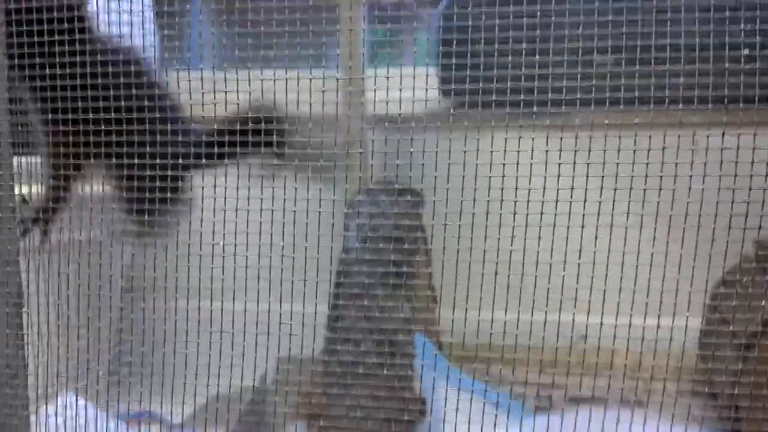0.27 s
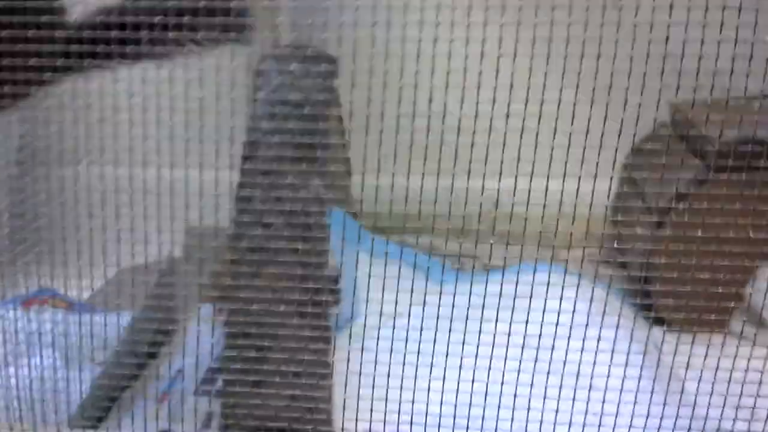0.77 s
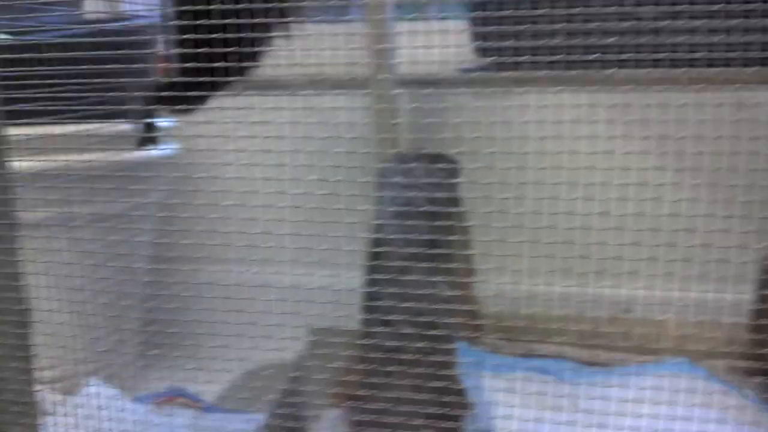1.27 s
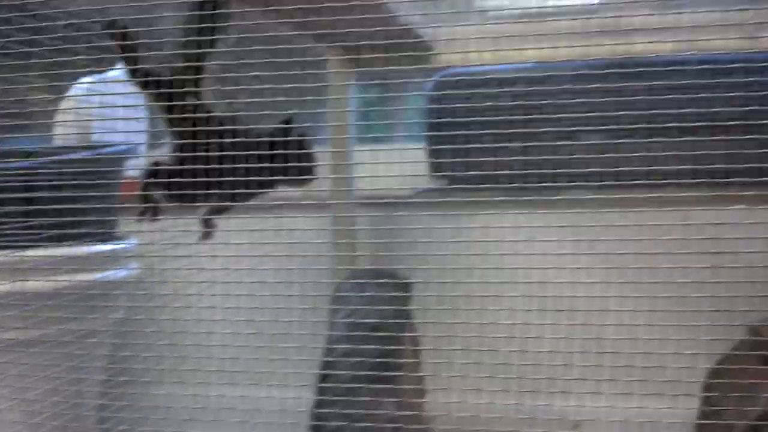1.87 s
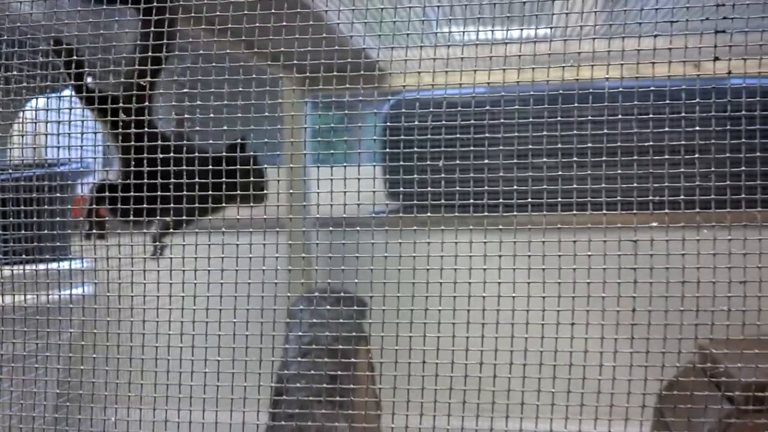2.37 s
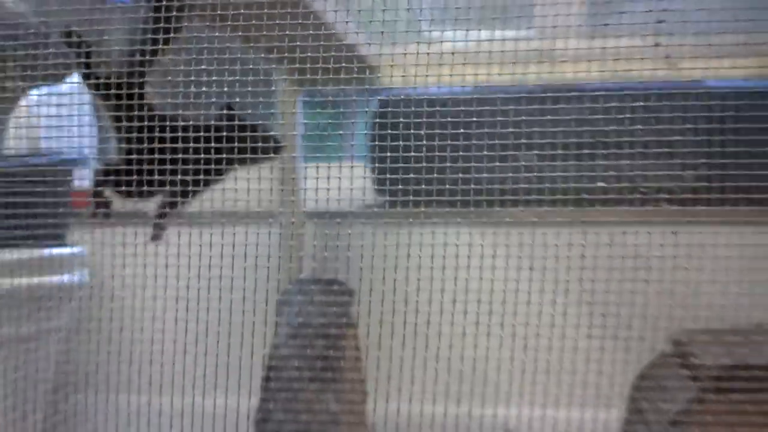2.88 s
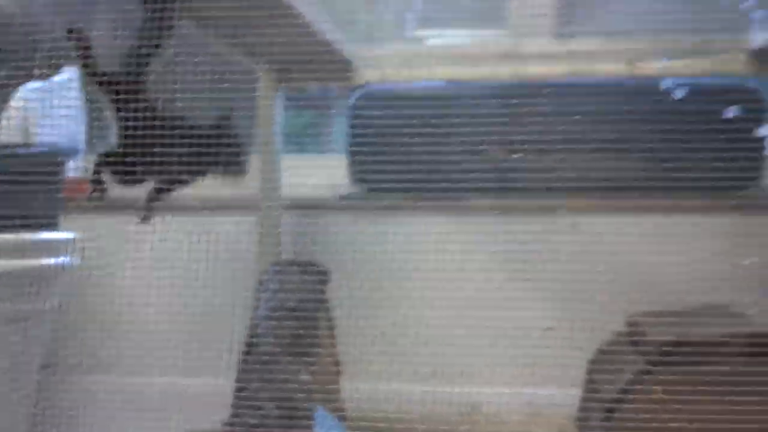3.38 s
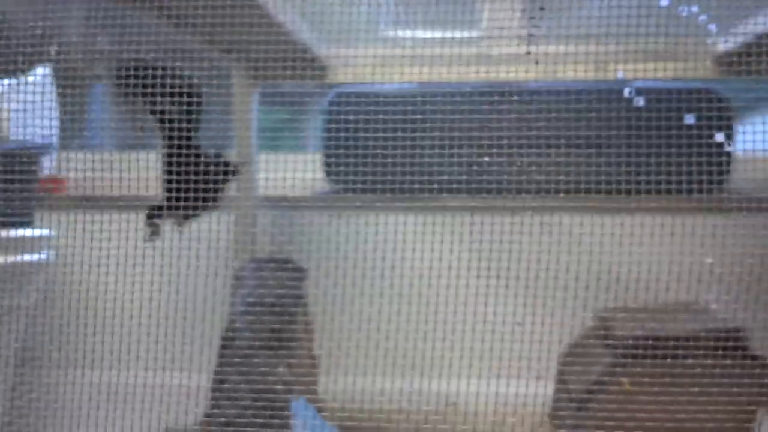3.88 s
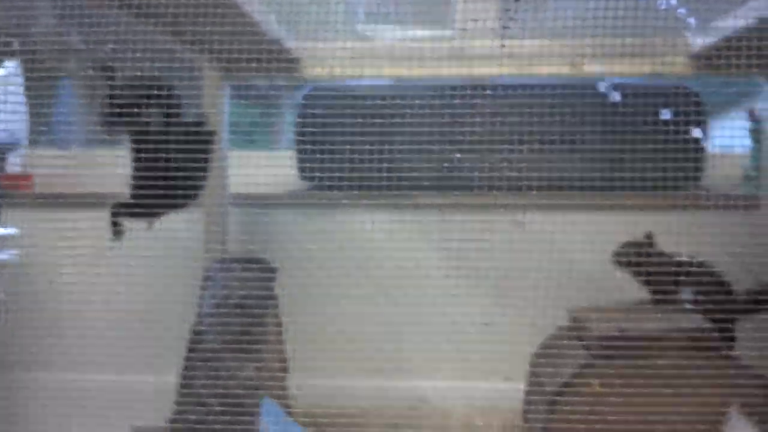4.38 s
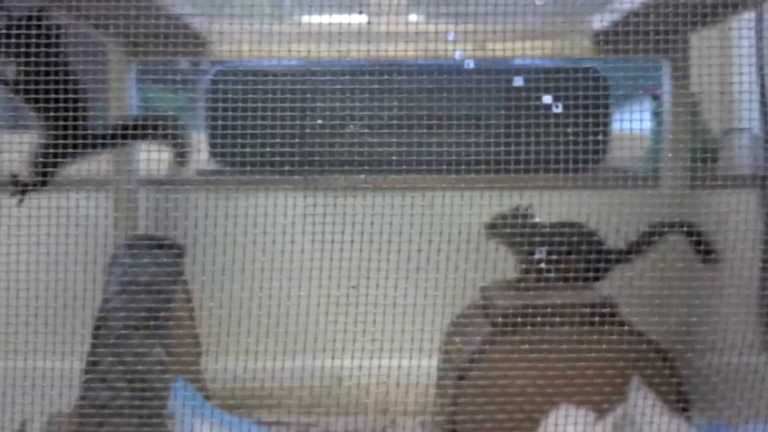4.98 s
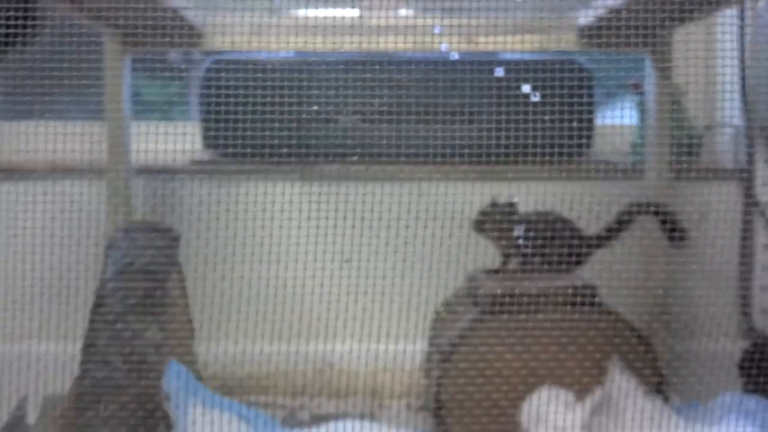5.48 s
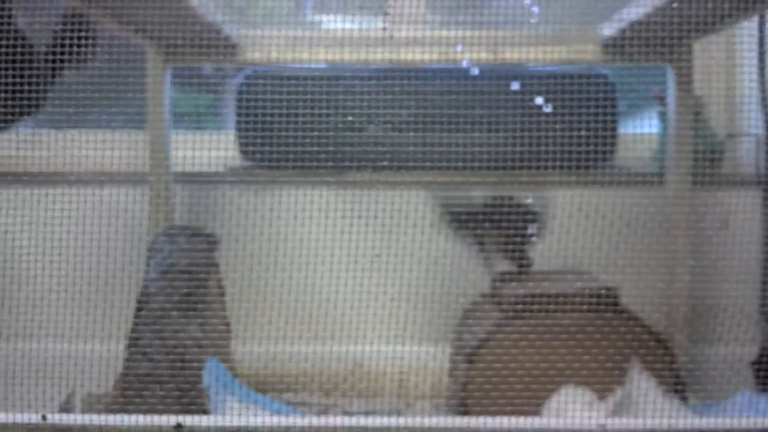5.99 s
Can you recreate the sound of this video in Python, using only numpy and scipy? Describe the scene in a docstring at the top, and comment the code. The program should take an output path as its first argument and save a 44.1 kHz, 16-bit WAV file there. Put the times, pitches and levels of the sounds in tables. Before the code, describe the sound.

In a small room, squirrels cling to a wire cage. Light scratching leads to a dense burst of sharp metallic ticks, scrapes and frame knocks just after one second. It thins to sparse scratches while a faint rasping squeal sags and rises. Around four seconds soft feet thump a hollow wooden box, then another claw flurry comes near five. A low fan hum and faint high lamp whine continue throughout. Close, wide stereo microphone.

```python
"""Young squirrels in a wire cage

Young squirrels scramble over a wire-mesh cage in a small room: claws scrape and tick on the wires, made from
bursts of noise and ringing tones, and the frame knocks through a few resonances.
A thin rasping squeal, built from wavering overtones, passes; one animal hops onto a hollow wooden nest box.
A fan hums and a lamp whines faintly; the camera widens the sound of its two close microphone ports."""
import sys
import numpy as np
from scipy import signal
from scipy.fft import rfft, irfft, next_fast_len
from scipy.io import wavfile
from scipy.ndimage import uniform_filter1d, map_coordinates

SR = 44100
rng = np.random.default_rng(int(sys.argv[2]) if len(sys.argv) > 2 else 0)


def output_pcm(signal):
    """Save a mono or channel-first signal as 16-bit PCM at the path in sys.argv[1].

    Samples are clipped to [-1, 1] before scaling.
    """
    pcm = np.clip(np.atleast_2d(signal).T, -1, 1) * 32767
    wavfile.write(sys.argv[1], SR, np.round(pcm).astype(np.int16))


N = 275297

# Levels in dB in all the tables are relative: each function balances them against its other parts.


def amp(db):
    """Turn dB into a plain multiplier."""
    return 10 ** (np.asarray(db) / 20)


def unit(x):
    """Scale a sound to an average (rms) level of 1."""
    return x / np.sqrt(np.mean(x ** 2) + 1e-20)


def along(points, hz):
    """Read a curve of (Hz, value) points on a log axis."""
    f, v = np.transpose(points)
    return np.interp(np.log(hz + 1), np.log(f + 1), v)


def curves(rows):
    """One value per sample for each column after the time."""
    s, *cols = np.transpose(rows)
    return [np.interp(np.arange(N) / SR, s, c) for c in cols]


def wobble(rate):
    """A smooth random curve with this many random knots a second."""
    knots = rng.standard_normal(int(N * rate / SR) + 4)
    return map_coordinates(knots, [np.arange(N) * rate / SR])


def filtered(x, response):
    """Shape x by a response that depends on frequency."""
    n = x.shape[-1]
    m = next_fast_len(n + SR // 4)
    return irfft(rfft(x, m) * response(np.fft.rfftfreq(m, 1 / SR)), m)[..., :n]


def coloured(x, spectrum):
    """x shaped by the given spectrum, at rms 1."""
    return unit(filtered(x, lambda hz: amp(along(spectrum, hz))))


def resonate(x, modes):
    """Pass x through a body's resonances, added with alternating sign."""
    def response(f):
        total = 0
        for k, (centre, width, db) in enumerate(modes):
            damping = 1j * f * width
            total = total + (-1) ** k * amp(db) * damping / (centre ** 2 - f ** 2 + damping)
        return total
    return filtered(x, response)


def ringing(x, modes):
    """The sum of separate narrow resonances driven by x."""
    return sum(resonate(x, [mode]) for mode in modes)


def tilted(hz, db_per_octave, pivot_hz):
    """dB that a harder or softer blow adds to a mode."""
    return db_per_octave * np.log2(hz / pivot_hz)


# How alike the two microphone ports hear a spread-out sound.
# Each row: frequency in Hz, likeness (1 the same, 0 unrelated, below 0 opposed).
PORT_LIKENESS = [(60, -1.08), (130, -0.77), (290, 0.16), (640, 0.27), (1400, 0.4), (2500, -0.13),
                 (15000, -0.008)]


def ports(pair):
    """Two unrelated sounds become a diffuse field at the two ports."""
    def shares(hz):
        turn = np.arccos(np.clip(along(PORT_LIKENESS, hz), -1, 1)) / 2
        return np.array([np.cos(turn), np.sin(turn)])
    mid, side = filtered(pair, shares)
    return np.array([mid + side, mid - side])


def add(track, s, sound):
    """Mix a sound into the track at time s in seconds."""
    start = max(0, round(s * SR))
    track[:, start:start + sound.shape[-1]] += sound[..., :N - start]


# How long the small room rings. Each row: frequency in Hz, time to fall by 60 dB in seconds.
ROOM_DECAY = [(150, 0.42), (1000, 0.13), (4000, 0.069), (15000, 0.11)]
WALL_S = 0.018  # round trip to the nearest wall


def in_room(x, wet_db, wall_db=-30):
    """The sound, its echo off the nearest wall and a fresh tail, each frequency dying at its own speed."""
    hz, t, z = signal.stft(rng.standard_normal((2, SR // 3)), SR, nperseg=256)
    fade = amp(-60 * t / along(ROOM_DECAY, hz)[:, None]) * (1 - np.exp(-t / 0.0023))
    tail = ports(signal.istft(z * fade, SR, nperseg=256)[1])
    tail *= amp(wet_db) / np.linalg.norm(tail[0])
    tail[:, round(WALL_S * SR)] += amp(wall_db)
    return x + signal.fftconvolve(np.atleast_2d(x), tail, axes=1)[:, :x.shape[-1]]


# The fan's draught, as a noise colour. Each row: frequency in Hz, strength in dB per Hz.
DRAUGHT_COLOUR = [(25, -1), (60, -5), (105, 5), (200, 5.5), (350, 5), (700, -0.5), (1200, -9), (2000, -19),
                  (4000, -23.5), (8000, -41), (15000, -21.5)]
# How loud the blade tone is. Each row: time in seconds, level in dB.
BLADE_TONE_LEVEL = [(0, -45.5), (0.7, -45.5), (0.83, -48.5), (0.95, -46.5), (2.33, -45.5), (2.45, -49),
                    (2.57, -45), (3.0, -45), (3.12, -49.5), (3.25, -44), (5.0, -43.5), (5.5, -43.5),
                    (6.2, -44.5)]
DRONE_HZ, DRONE_DB, BLADE_HZ = 195.6, -58.5, 525.9  # the fan's two tones


def fan():
    """Steady moving air (noise), a faint wavering drone and a blade tone that swells and dips."""
    t = np.arange(N) / SR
    blade_db, = curves(BLADE_TONE_LEVEL)
    drone_swing = np.sin(2 * np.pi * DRONE_HZ * t + 0.68 * wobble(7.5))
    drone = amp(DRONE_DB + 1.8 * wobble(3.96)) * drone_swing
    blade_swing = np.sin(2 * np.pi * BLADE_HZ * t + 0.18 * wobble(9.7))
    blade = amp(blade_db + 0.34 * wobble(7.6)) * blade_swing
    air = coloured(ports(rng.standard_normal((2, N))), DRAUGHT_COLOUR)
    return amp(-49.0) * air + (drone + blade) * amp([[-.8], [.8]])  # tones slightly to the right


# The lamp's two high resonances. Each row: centre in Hz, width in Hz.
LAMP_RESONANCES = [(11370, 330), (12140, 200)]
# How loud they are. Each row: time in seconds, lower resonance in dB, upper resonance in dB.
LAMP_LEVELS = [(0, -66, -68), (0.5, -65, -70), (0.7, -70, -66), (2.0, -68.5, -68), (3.4, -66, -71),
               (4.2, -64.5, -69), (4.6, -66, -74), (5.5, -65, -76), (6.2, -70, -76)]


def lamp():
    """Mains harmonics fill the lamp's two high resonances, which come and go in turn as the camera moves."""
    harmonics_hz = 59.94 * np.arange(184, 207)
    t = np.arange(N) / SR

    def harmonic(hz):
        start_phase = rng.uniform(0, 2 * np.pi, (2, 1))
        flicker = amp(4 * wobble(1.5))
        return flicker * np.sin(2 * np.pi * hz * t + 1.5 * wobble(2.5) + start_phase)

    lines = [harmonic(hz) for hz in harmonics_hz]

    def cluster(centre, width):
        weights = 1 / np.sqrt(1 + (2 * (harmonics_hz - centre) / width) ** 4)
        return unit(sum(weight * line for weight, line in zip(weights, lines)))

    levels = curves(LAMP_LEVELS)
    return sum(amp(db) * cluster(*resonance) for resonance, db in zip(LAMP_RESONANCES, levels))


def slips(per_second, spread_db, t60, rub):
    """Noise in tiny stick-slip bursts of uneven size over a share of steady rubbing."""
    t = np.arange(SR // 10) / SR
    sizes = amp(spread_db * np.minimum(rng.exponential(size=N), 3)) ** 2
    energy = (rng.random(N) < per_second / SR) * sizes
    power = np.abs(signal.fftconvolve(energy, amp(-60 * t / t60) ** 2)[:N])
    power /= uniform_filter1d(power, size=4000) + power.mean() / 20  # evens out crowded moments
    return np.sqrt(power + abs(rub)) * rng.standard_normal((2, N))


def clicks(count, low_hz, high_hz, cycles, spread_db):
    """Single claw contacts at random moments, each a dying tone of its own pitch and size; rms 1."""
    t = np.arange(SR // 40) / SR

    def train():
        when, pitch, size = rng.random((count, 3)).T[..., None]
        hz = low_hz * (high_hz / low_hz) ** pitch
        loudness = amp(spread_db * np.minimum(-np.log(1 - size), 2)) * np.sqrt(hz)
        grains = loudness * np.exp(-t * hz / cycles) * np.sin(2 * np.pi * hz * t)
        places = (when * N).astype(int) + np.arange(len(t))
        return np.bincount(places.ravel(), grains.ravel(), N)[:N]

    return unit(ports(np.array([train(), train()])))


# How restless the clinging animals are. Each row: time in seconds, extra level in dB.
RESTLESSNESS = [(0, 5.5), (0.7, 1.5), (2.5, 1.5), (3.65, 6), (4.4, 0.5), (6.2, -0.5)]
# A paw drags over the mesh. Each row: start in seconds, length in seconds, rattle of the panel in dB,
# scrape on the wire in dB, sharpness of the claws in dB (hiss compared with scrape).
PAW_STROKES = [(0.143, 0.057, -59, -52, 5), (0.258, 0.15, -52, -53, 4.5), (0.407, 0.13, -59.5, -58, 4.5),
               (0.839, 0.099, -64, -59, 7), (0.958, 0.13, -51.5, -54.5, 0.5),
               (1.072, 0.075, -41.5, -38, 1.5), (1.166, 0.12, -40, -41, 1.5),
               (1.296, 0.064, -42.5, -40.5, 3), (1.357, 0.049, -41, -50.5, 6),
               (1.483, 0.097, -54, -53.5, 2.5), (1.535, 0.19, -54, -56, 5.5),
               (1.714, 0.12, -53.5, -51.5, 2.5), (2.093, 0.14, -77, -48, 2), (2.209, 0.16, -52, -51, 1),
               (2.639, 0.066, -69, -53.5, 3.5), (2.674, 0.1, -54.5, -49, 1), (2.826, 0.041, -56, -55.5, 0),
               (2.897, 0.083, -55, -58.5, 11), (2.961, 0.086, -51, -50, -2), (3.122, 0.056, -62, -57, 1.5),
               (3.315, 0.049, -58, -74, 11), (3.392, 0.051, -66, -57.5, 6.5), (3.729, 0.084, -58, -52.5, 5),
               (3.781, 0.035, -47, -56, 11), (3.824, 0.091, -42.5, -45.5, 0.5), (3.964, 0.084, -59, -52, 1),
               (4.075, 0.12, -55.5, -56.5, 3), (4.582, 0.12, -58.5, -57.5, 3.5),
               (4.71, 0.047, -49.5, -48, -2), (4.898, 0.13, -45.5, -51, 3.5),
               (5.078, 0.064, -45.5, -45.5, -4), (5.146, 0.036, -39.5, -43, -1.5),
               (5.227, 0.026, -41.5, -50, 1.5), (5.818, 0.027, -53.5, -61.5, 4),
               (5.911, 0.081, -55.5, -55.5, 0), (6.121, 0.049, -46, -50, -4)]
GRIP_S = 0.028  # a claw takes this long to bite


def effort(levels_db, fall_db_per_s, cling_db):
    """Each stroke bites, holds and dies away; the strokes add in power over the stir of clinging paws."""
    restless_db, = curves(RESTLESSNESS)
    power = amp(cling_db + restless_db) ** 2
    t = np.arange(N) / SR
    for (start, length, *_), db in zip(PAW_STROKES, levels_db):
        near = slice(max(0, int(start * SR)), int((start + length + 0.5) * SR))
        age = t[near] - start
        bite = np.clip(age / GRIP_S, 0, 1)
        power[near] += (bite * amp(db - fall_db_per_s * np.maximum(age - length, 0))) ** 2
    return np.sqrt(power)


# Noise colours of the rattling panel, a scraped wire and a sharp claw tip on wire.
# Each row: frequency in Hz, strength in dB per Hz.
PANEL_COLOUR = [(40, -43), (100, -16), (250, -6.5), (540, 1), (800, 1), (1000, -0.5), (1280, -1.5),
                (1520, -9.5), (2400, -10.5), (4000, -20), (8000, -65)]
WIRE_COLOUR = [(600, -14), (1700, 0.5), (2700, 1), (4200, 2.5), (6000, -1.5), (8000, -11), (12000, -16.5)]
TIP_HISS_COLOUR = [(2000, -53), (6000, -3), (9000, -0.5), (12500, 0.5), (15000, 3.5), (16000, 4)]
# Resonances of the stretched mesh. Each row: centre in Hz, width in Hz, level in dB.
MESH_RESONANCES = [(1296, 31, -28), (1620, 52, 2), (1940, 12, -22), (2380, 150, 8), (3650, 56, 4),
                   (4570, 20, -13)]
RATTLE_FALL_DB_PER_S, SCRAPE_FALL_DB_PER_S, HISS_FALL_DB_PER_S = 142, 126, 134  # after the paw lets go
# animals hanging on the mesh never keep quite still (before restlessness is added)
CLING_RATTLE_DB, CLING_SCRAPE_DB, CLING_HISS_DB = -62, -68.5, -65.5


def scramble():
    """Claws slip and click over wires, which ring, hiss under a sharp tip and set the loose panel rattling."""
    _, _, rattle_db, scrape_db, sharp_db = np.transpose(PAW_STROKES)  # one set of strokes drives all layers
    rattle = coloured(ports(slips(per_second=140, spread_db=1.5, t60=0.042, rub=0.56)), PANEL_COLOUR)
    ring = coloured(ports(slips(per_second=210, spread_db=0.0, t60=0.11, rub=0.4)), WIRE_COLOUR)
    hiss = coloured(ports(slips(per_second=210, spread_db=-1.0, t60=0.042, rub=0.48)), TIP_HISS_COLOUR)
    taps = clicks(count=600, low_hz=628, high_hz=1880, cycles=2.3, spread_db=4.0)
    pings = clicks(count=650, low_hz=2076, high_hz=6900, cycles=9, spread_db=6.0)
    panel = amp(-0.5) * rattle + amp(-5.0) * taps
    wires = amp(-2.0) * ring + amp(-5.5) * pings
    cage = panel * effort(rattle_db, RATTLE_FALL_DB_PER_S, CLING_RATTLE_DB)
    cage = cage + wires * effort(scrape_db, SCRAPE_FALL_DB_PER_S, CLING_SCRAPE_DB)
    cage = cage + amp(0.5) * hiss * effort(scrape_db + sharp_db, HISS_FALL_DB_PER_S, CLING_HISS_DB)
    return in_room(cage + amp(-10) * ringing(cage, MESH_RESONANCES), wet_db=-3.0)


# A claw snaps off a wire. Each row: start in seconds, level in dB, share of hiss in dB,
# pitch of the wire in Hz, its ping in dB, first crack in dB (these last two compared with the level).
WIRE_TICKS = [(0.082, -39, -0.5, 6350, -12, -6), (0.199, -44, 2, 6000, -10, -8),
              (0.4882, -45.5, -24, 3585, 5.5, -12), (0.9442, -34, 0, 3360, -12, -13),
              (1.046, -29.5, -0.5, 3760, -6.5, -12), (1.078, -29.5, -1, 2960, 2, 10.5),
              (1.1273, -24, 1, 3220, -11, -2), (1.1503, -25.5, -14, 3660, -14, -4),
              (1.186, -40, 0, 4170, -8, -3), (1.215, -31, -16, 3400, 1, 4), (1.302, -26, 1, 2710, -17, -4),
              (1.3368, -24, -12, 4260, -3, 1), (1.354, -33, -10, 4270, -3, -2),
              (1.435, -28.5, -5, 3230, -0.5, -3), (1.533, -43, -10, 3640, 2, 6),
              (1.556, -32.5, -4, 5700, -13, 6.5), (1.743, -47, -7, 4140, -10, -3),
              (1.784, -33.5, -17, 2870, -11, -6), (1.8617, -34.5, -20, 2530, -8, -9),
              (1.959, -48, -15, 4300, 1.5, 2), (2.063, -40, -0.5, 2490, -10, -10),
              (2.268, -43, -3, 3220, 4, 0), (2.328, -40, 0, 2500, 0, 0), (2.354, -44, 0, 9500, -10, 1),
              (2.729, -43, -18, 5900, 7, -6), (2.85, -40.5, -15, 2960, 1, -6),
              (2.988, -39.5, -15, 4400, -4, 2), (3.0212, -32.5, -25, 4280, -9, 7.5),
              (4.0012, -30.5, 5, 9600, -24, 10), (4.039, -42.5, -11, 3800, 4, -6),
              (4.209, -33, 6, 5050, -10, -10), (4.889, -32.5, 0, 5760, -16, -14),
              (4.926, -29, 7, 2240, -17, -16), (5.021, -41.5, -2, 3800, -8, 0),
              (5.064, -26, 1, 8800, -15, -6), (5.1255, -24.5, 1, 8900, -23, -8),
              (5.1667, -28, 0, 2130, -5, -6), (5.198, -38, -5, 4000, -4, 2), (5.26, -36, -6, 4100, -6, 0),
              (5.833, -41, -19, 4200, -16, 0), (5.851, -45, -15, 4170, -12, 4),
              (6.107, -37.5, -0.5, 2770, -12, -8), (6.158, -27, -1.5, 4880, -14, -16)]
CRACK_CYCLES = 1.5  # a wire's first crack dies within a few swings
PING_WIDTH_HZ = 190


def ticks():
    """A released wire cracks, chatters against its crossings and pings at the pitch of its span."""
    out, t = np.zeros((2, N)), np.arange(SR // 4) / SR
    # three decays together: a fast start and a longer end
    snap = amp(-6) * amp(-60 * t / 0.015) + amp(-4) * amp(-60 * t / 0.054) + amp(-3) * amp(-60 * t / 0.093)
    bite = 1 - np.exp(-t / 0.00067)  # the hiss takes a moment to build
    for s, db, hiss_db, wire_hz, ping_db, crack_db in WIRE_TICKS:
        chatter = ports(rng.standard_normal((2, len(t))))
        share = np.clip(amp(hiss_db) ** 2, 0, .95)
        wire = np.sqrt(1 - share) * coloured(chatter, WIRE_COLOUR)
        hiss = np.sqrt(share) * bite * coloured(chatter[:, ::-1], TIP_HISS_COLOUR)
        noise = rng.standard_normal((2, len(t)))
        ping = amp(ping_db) * unit(resonate(noise, [(wire_hz, PING_WIDTH_HZ, 0)]))
        swing = np.exp((2j * np.pi - 1 / CRACK_CYCLES) * wire_hz * t)
        crack = amp(db + crack_db) * ports(np.array([swing.imag, swing.real]))
        add(out, s, in_room(crack + amp(db - 10.5) * (wire + hiss + ping) * snap, wet_db=-2.5))
    return out


# The cage frame's resonances. Each row: centre in Hz, width in Hz, level in dB.
FRAME_RESONANCES = [(539.5, 42, 12.5), (955, 770, -1.5), (1153, 140, 7.5), (1318, 134, 3.5),
                    (1480, 140, -7.5), (1990, 350, -18)]
# The whole cage sways. Each row: centre in Hz, width in Hz, level in dB.
SWAY_RESONANCES = [(133.4, 23, -6.5), (263, 106, -0.5), (383, 109, 2)]
# The panel slaps its frame, as a noise colour. Each row: frequency in Hz, strength in dB per Hz.
CLACK_COLOUR = [(40, -60), (150, -25), (500, -6), (900, 3.5), (1700, -2.5), (2600, -3.5), (5000, -23)]
CLACK_T60_S = 0.047
# Paws jolt the frame. Each row: start in seconds, level in dB, low thud in dB,
# hardness in dB per octave, clack in dB (thud and clack compared with the level).
FRAME_KNOCKS = [(0.235, -26, -15.5, -6.5, -11), (0.351, -32, -11.5, -4, -8), (0.383, -31.5, -21, -5, -10),
                (0.545, -44, -22, -8, 7.5), (1.077, -30, -30, 2, -4), (1.115, -33.5, -17, 7, 1),
                (1.151, -23, -10.5, 1.5, -6), (1.1792, -28, -18, 9, -3), (1.208, -31, -18, 10, -8),
                (1.2171, -27.5, -13, 14, 1), (1.2416, -24, -14, 6, -6), (1.27, -24, -15, 12, -3),
                (1.3003, -21, -18.5, 13, -6), (1.337, -41, -22, 12, -10), (1.355, -30, -20, 19, -6),
                (1.418, -33.5, -11, 7, 1), (1.435, -14.5, -10.5, 3, -7.5), (1.455, -38.5, -2, 2, -11),
                (1.556, -28.5, -16, -6, -15), (1.657, -32, -15.5, -6, -1.5), (2.303, -35.5, -8.5, -15, -15),
                (3.006, -34.5, -14, 2, -6), (3.0328, -21, -27, 3.5, -15), (3.043, -35, -26, -1, -3),
                (3.862, -34, -20, 8, -2), (4.0007, -39, -18, 18, -12), (4.763, -40.5, -2.5, -5, -6),
                (4.981, -40, -10, 4, 1), (5.102, -40, -7, 7, -7), (5.261, -44, -18, 0, -6)]


def knocks():
    """A paw's push rings the frame, sways the cage and clacks the loose panel."""
    out, t = np.zeros((2, N)), np.arange(SR // 3) / SR
    push = np.where(t == 0, 1.0, 0.0)
    thud = resonate(push, SWAY_RESONANCES)
    thud = thud / np.abs(thud).max()
    for s, db, thud_db, hardness, clack_db in FRAME_KNOCKS:
        modes = [(hz, width, level + tilted(hz, hardness, pivot_hz=900))
                 for hz, width, level in FRAME_RESONANCES]
        frame = resonate(push, modes)
        slap = coloured(ports(rng.standard_normal((2, len(t)))), CLACK_COLOUR)
        clack = slap * amp(-60 * t / CLACK_T60_S)
        blow = frame / np.abs(frame).max() + amp(thud_db + 7.5) * thud + amp(clack_db - 3.5) * clack
        add(out, s, amp(db - 1.5) * in_room(blow, wet_db=-7.5, wall_db=-37))
    return out


# The squeal's path. Each row: time in seconds, pitch in Hz, level in dB.
SQUEAL_PATH = [(2.1, 552, -80), (2.135, 542, -46), (2.2, 507, -40), (2.27, 503, -42), (2.32, 480, -42),
               (2.39, 465, -42), (2.46, 456, -49), (2.53, 470, -47), (2.59, 472, -50), (2.66, 489, -44),
               (2.74, 520, -48), (2.82, 524, -72)]
# Its overtones. Each row: multiple of the pitch, level in dB, lift in dB per Hz of strain.
SQUEAL_OVERTONES = [(4, -8, -0.15), (5, 0, 0), (6, -13, 0.1), (10, -11, 0.25)]
EASY_HZ, MAX_STRAIN_HZ = 472, 25  # the squeal brightens as its pitch rises above the easy pitch
CLEAR_DB, RASP_DB = -2, -5  # balance of clear tone and rasp


def squeal():
    """A thin, broken, rasping squeal sags and rises again; strain lifts its upper overtones."""
    pitch_hz, db = curves(SQUEAL_PATH)
    strain_hz = np.clip(pitch_hz - EASY_HZ, -MAX_STRAIN_HZ, MAX_STRAIN_HZ)
    phase = 2 * np.pi * np.cumsum(pitch_hz * (1 + 0.009 * wobble(40))) / SR

    def rasp(k):  # a narrow band of noise around the overtone
        noise = wobble(k * 70) + 1j * wobble(k * 70)
        return unit(np.real(noise * np.exp(1j * k * phase)))

    def clear(k):
        return np.sqrt(2) * np.sin(k * phase + 1.2 * wobble(7 * k))

    def overtone(k):
        flicker = amp(2.6 * wobble(29.83))
        return flicker * (amp(CLEAR_DB) * clear(k) + amp(RASP_DB) * rasp(k))

    def cry():
        return sum(amp(level + lift * strain_hz) * overtone(k) for k, level, lift in SQUEAL_OVERTONES)

    loudness = amp(db - 9 + 2.5 * wobble(24.14))
    return in_room(loudness * ports(np.array([cry(), cry()])), wet_db=-3.5)


# The hollow box. Each row: frequency in Hz before a hop shifts it, level in dB, time to fall 60 dB in seconds.
BOX_MODES = [(344, -21.5, 0.15), (380.4, 0.5, 0.054), (433, -23, 0.085), (746, -19, 0.085)]
# Its lid. Each row: frequency in Hz, level in dB, time to fall 60 dB in seconds.
LID_MODES = [(1217, -9.5, 0.037), (1505, -14, 0.031), (1620, -2.5, 0.024), (1780, -15, 0.03)]
# Feet land on the box. Each row: start in seconds, pad thump in dB, claw tap in dB, pitch ratio,
# hardness in dB per octave.
BOX_HOPS = [(4.039, -55, -27, 1.0, 0), (4.064, -17.5, -51, 1.02, 8.5), (4.114, -7.5, -19, 0.97, -9),
            (4.136, -20, -44, 1.14, 0), (4.172, -37, -50, 1, 18), (4.187, -36, -27, 0.91, -8),
            (4.221, -28, -39, 0.953, -4), (4.302, -55, -36, 0.86, 0), (4.633, -54, -24.5, 1.0, 0)]
LOAD_SAG, LOAD_S = 0.04, 0.0123  # a foot's weight first lowers the pitch by this share; it eases over this time
AIR_MODES_BELOW_HZ = 500  # only the box's air modes take the hop's pitch ratio; its boards do not


def nest_box():
    """Soft pads thump the hollow box, a little to the left, and claws tap its lid; thumps bend up as weight lifts."""
    out, t = np.zeros((2, N)), np.arange(SR // 3) / SR
    loaded = np.cumsum(1 - LOAD_SAG * np.exp(-t / LOAD_S)) / SR  # a clock that starts slow bends the pitch

    def ring(modes, clock):
        return sum(amp(db - 60 * t / t60) * np.sin(2 * np.pi * hz * clock) for hz, db, t60 in modes)

    for s, pad_db, claw_db, pitch, hardness in BOX_HOPS:
        hollow = []
        for hz, db, t60 in BOX_MODES:
            shifted_hz = hz * pitch if hz < AIR_MODES_BELOW_HZ else hz
            hollow.append((shifted_hz, db + tilted(hz, hardness, pivot_hz=380), t60))
        thump = amp(pad_db) * ring(hollow, loaded) * (1 - np.exp(-t / 0.0052)) ** 2  # soft pad, slow start
        tap = amp(claw_db - 10) * ring(LID_MODES, t) * (1 - np.exp(-t / 0.00055))
        add(out, s, in_room(thump, wet_db=-7.0, wall_db=-28) + in_room(tap, wet_db=0))
    return out * amp([[2], [-3]])


TURN_DB_PER_S, TOP_OCTAVE_HZ = 0.5, 10800  # the camera pans away from the claws, which dulls their top octave


def panned_away(x):
    """The top octave fades evenly as the microphone turns off the claws."""
    top = filtered(x, lambda hz: 1 - 1 / (1 + (hz / TOP_OCTAVE_HZ) ** 8))
    seconds_from_middle = (np.arange(N) - N / 2) / SR
    return x - top + top * amp(-TURN_DB_PER_S * seconds_from_middle)


def scene():
    """Claws, knocks, the squeal and the box over the fan and the lamp."""
    claws = panned_away(scramble() + ticks())
    return fan() + lamp() + claws + knocks() + squeal() + nest_box()


NULL_HZ = 2756  # where the ports' sum first vanishes
TOP_HZ = 15800  # nothing passes from here up


def record(dry):
    """The camera widens its two ports: their sum and difference are combed in turn, so the treble spreads out."""
    def angle(hz):
        return np.pi * hz / NULL_HZ
    mid = filtered(dry[0] + dry[1], lambda hz: np.where(hz < NULL_HZ / 2, 1, np.sin(angle(hz)))) / 2
    side = filtered(dry[0] - dry[1], lambda hz: np.cos(angle(hz))) / 2
    wide = np.array([mid + side, mid - side])
    # Each row: frequency in Hz, microphone gain in dB.
    microphone = [(30, -25.0), (90, -3.0), (700, 0.0), (2000, 3.0)]
    return filtered(wide, lambda hz: amp(along(microphone, hz)) * (hz < TOP_HZ))


dry = scene()
out = record(dry)
output_pcm(out)
```